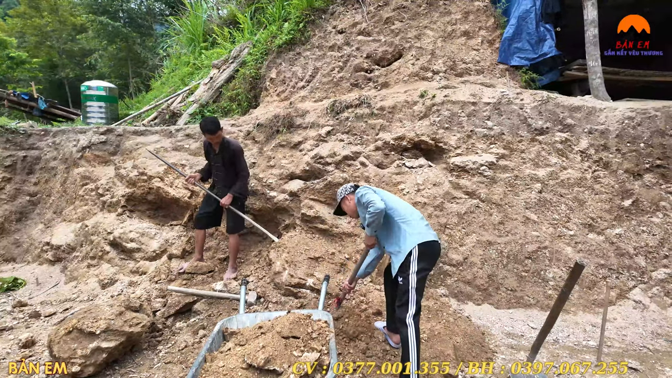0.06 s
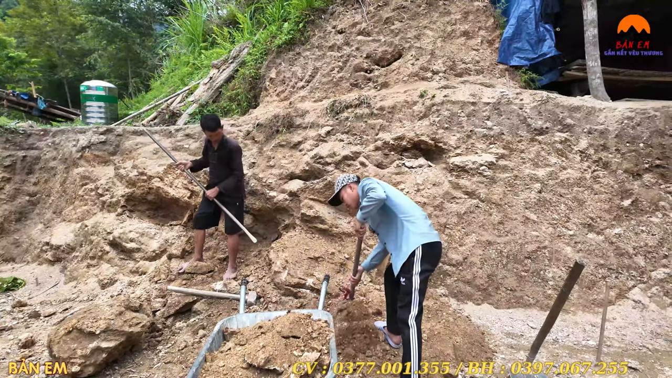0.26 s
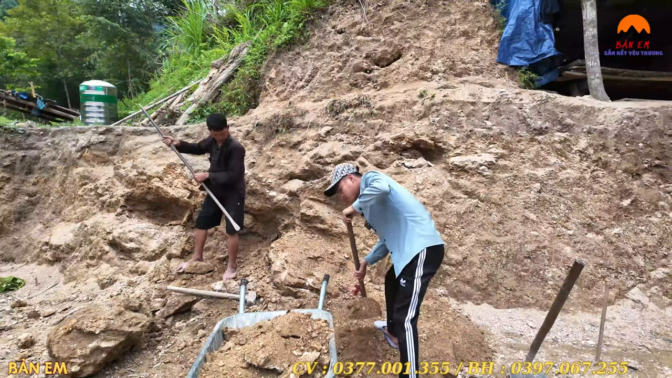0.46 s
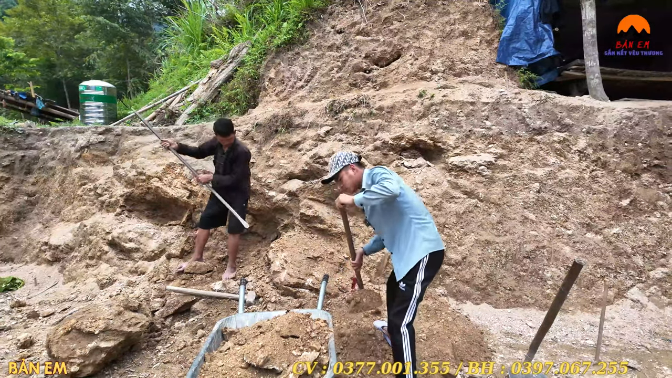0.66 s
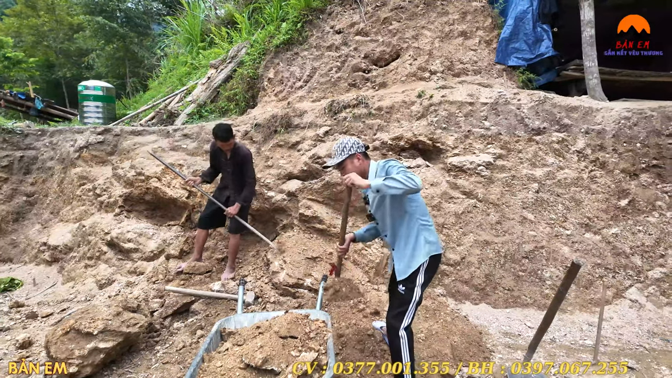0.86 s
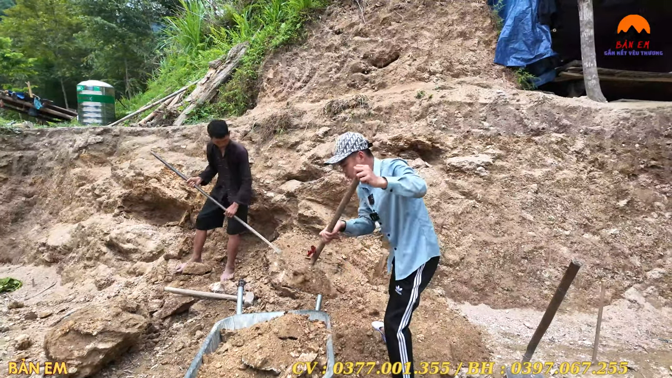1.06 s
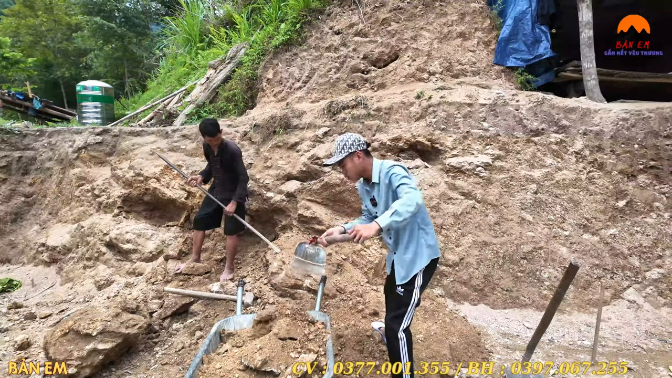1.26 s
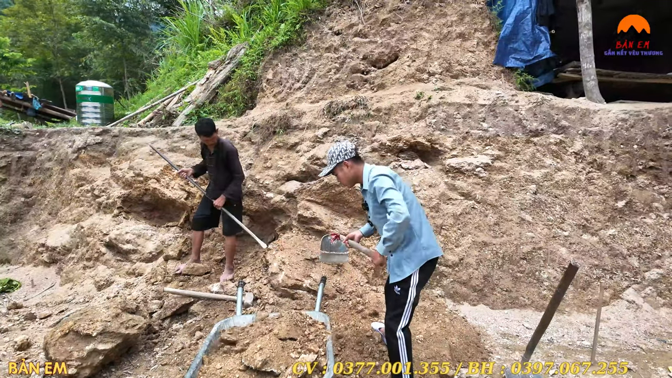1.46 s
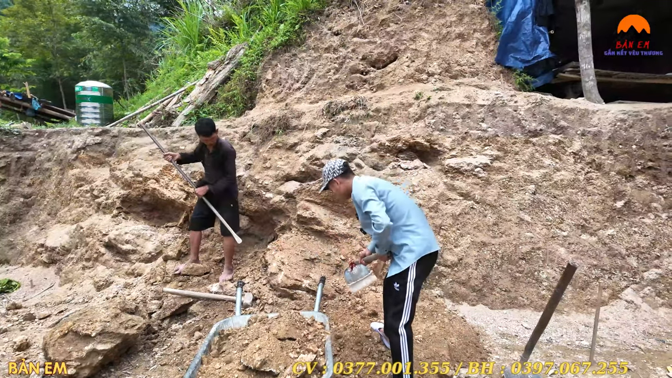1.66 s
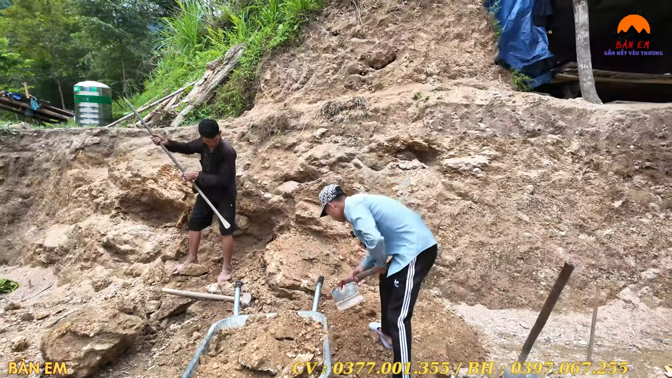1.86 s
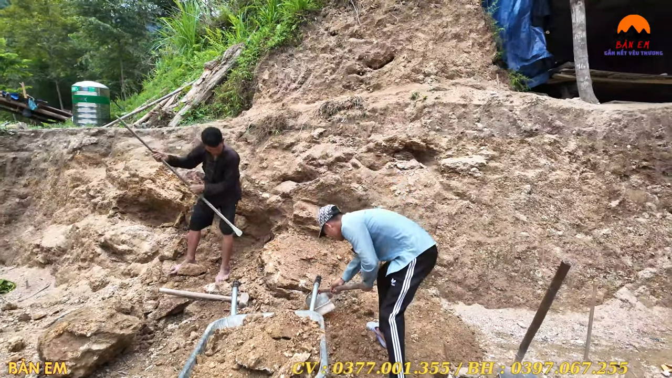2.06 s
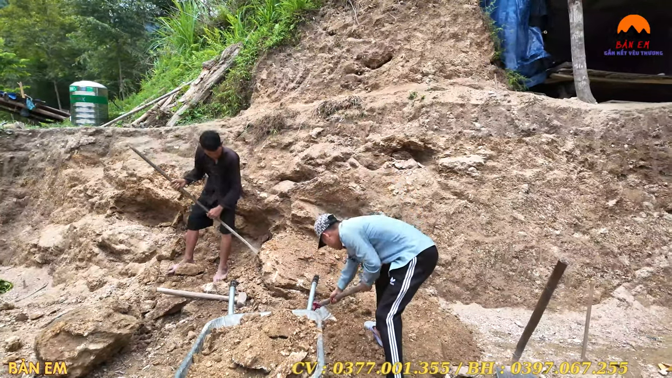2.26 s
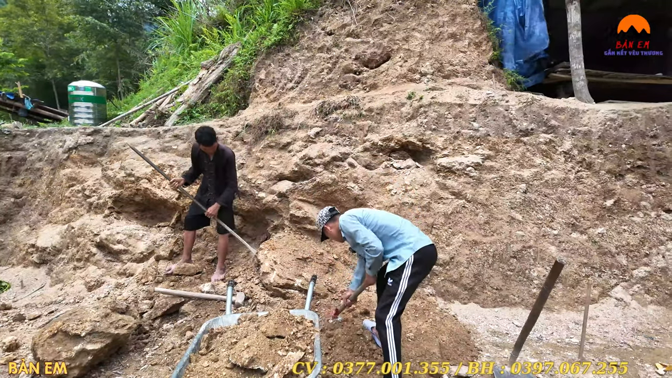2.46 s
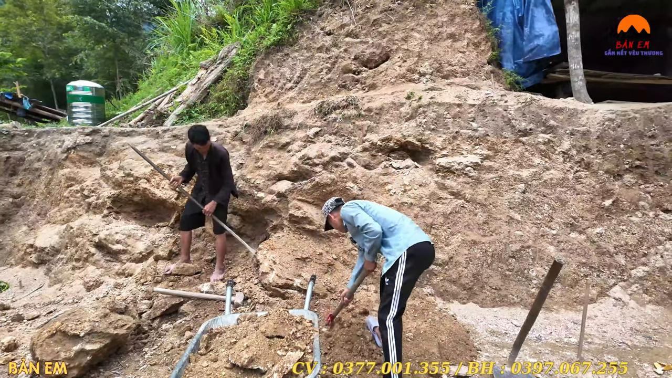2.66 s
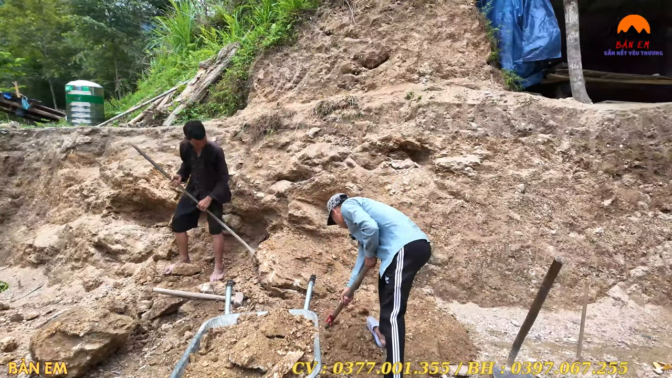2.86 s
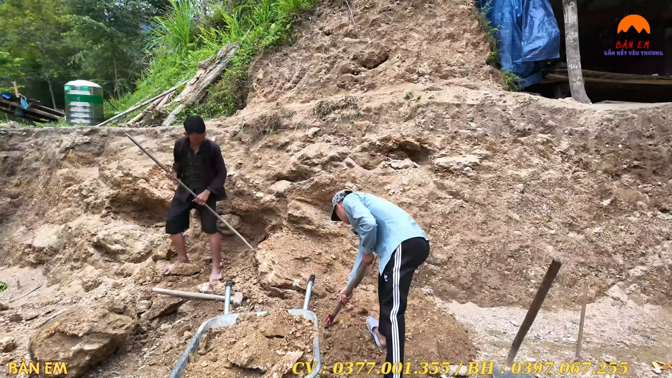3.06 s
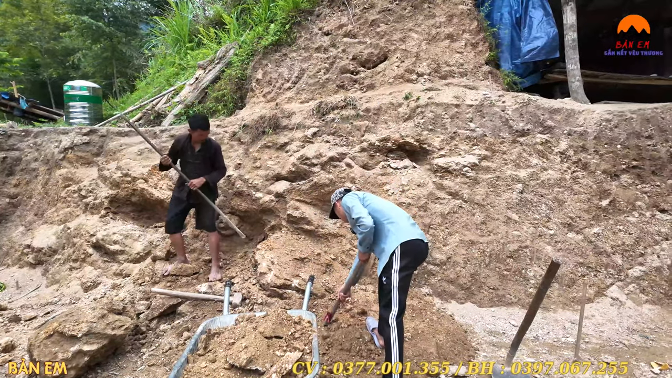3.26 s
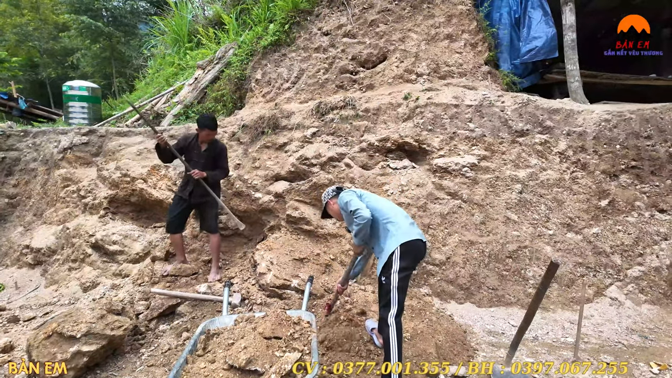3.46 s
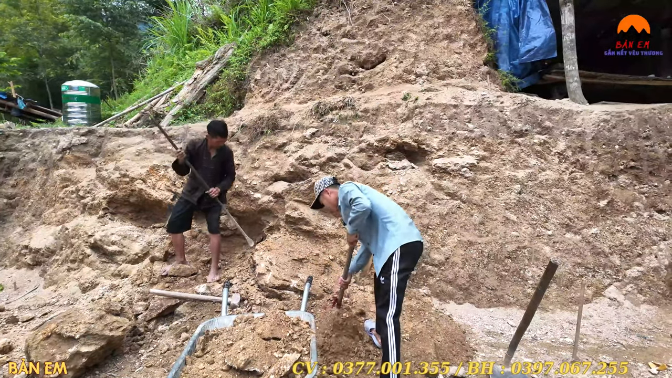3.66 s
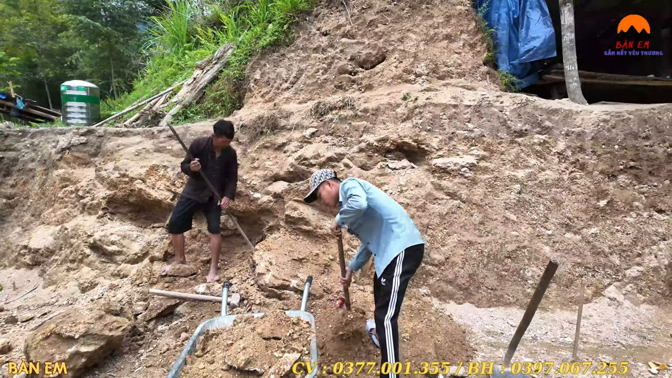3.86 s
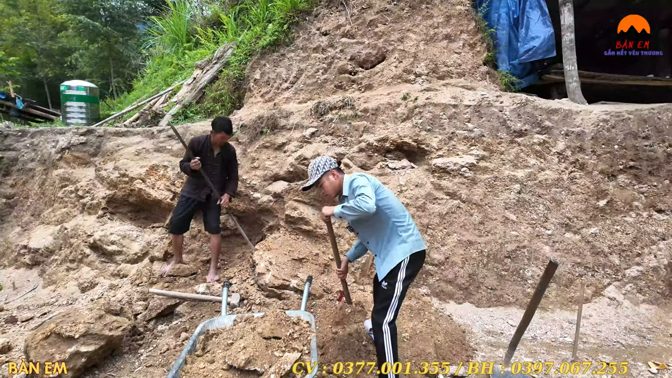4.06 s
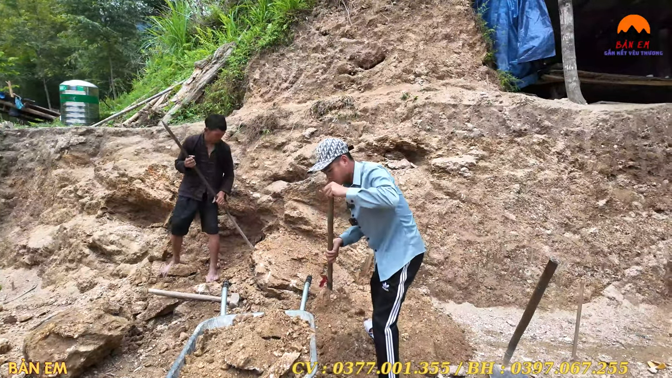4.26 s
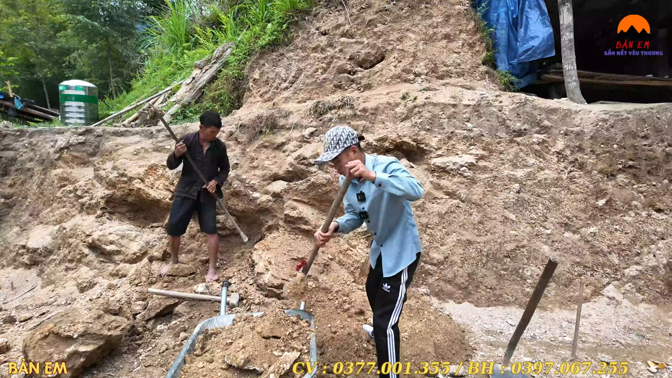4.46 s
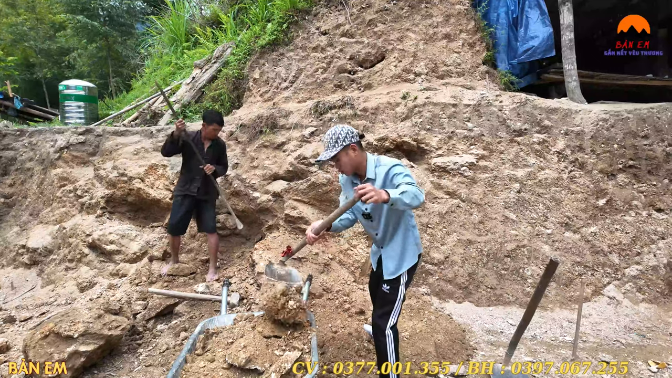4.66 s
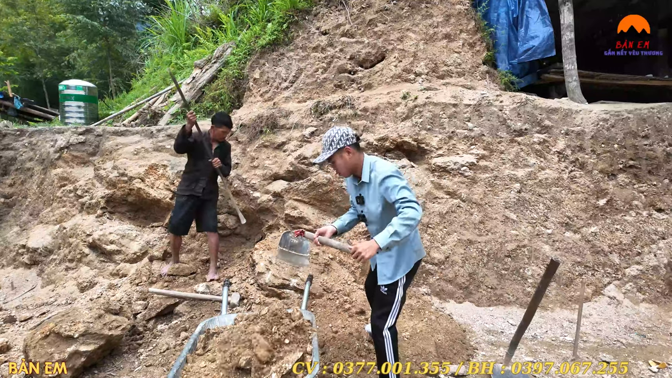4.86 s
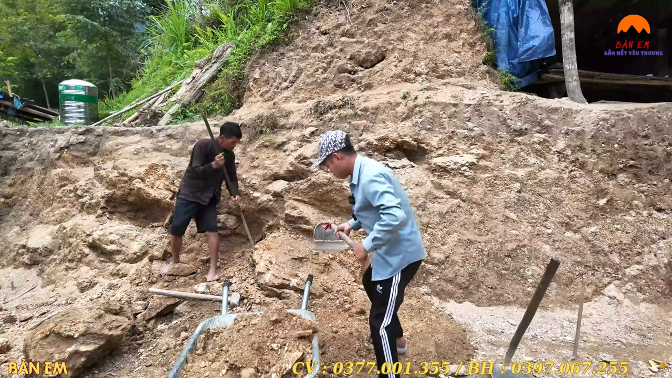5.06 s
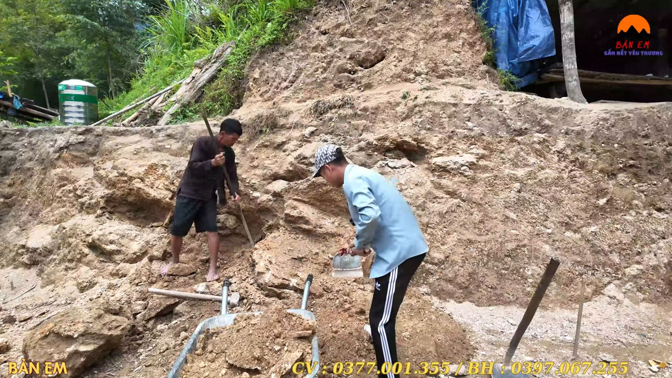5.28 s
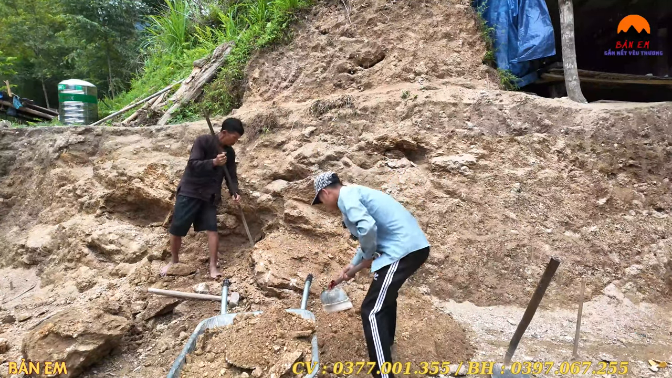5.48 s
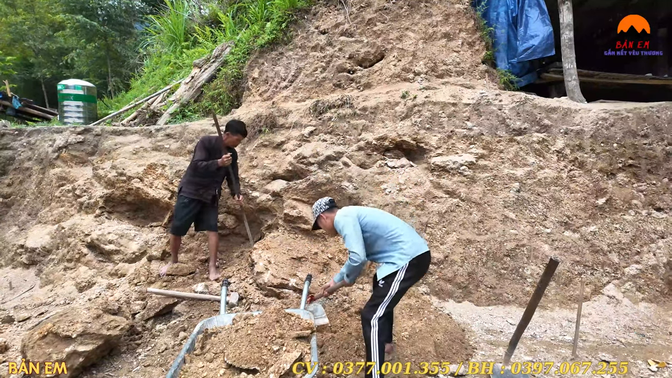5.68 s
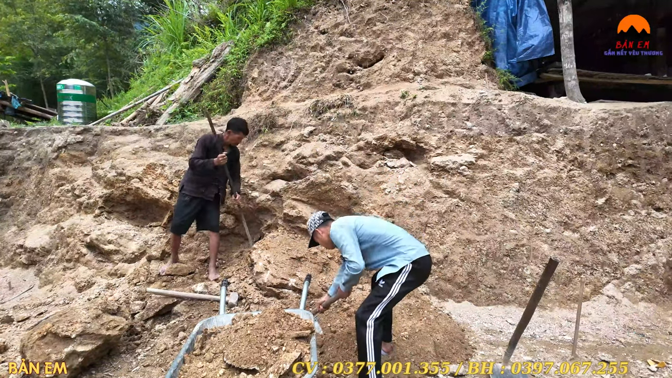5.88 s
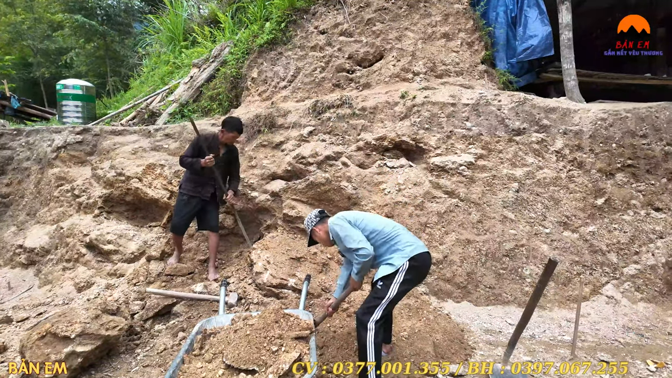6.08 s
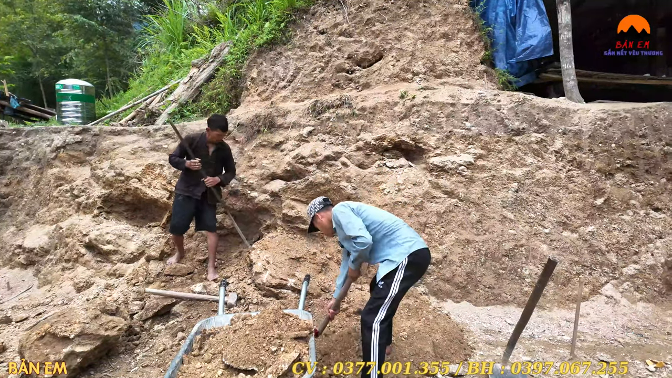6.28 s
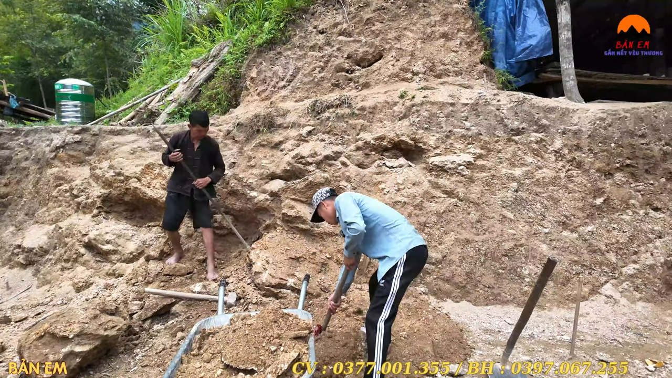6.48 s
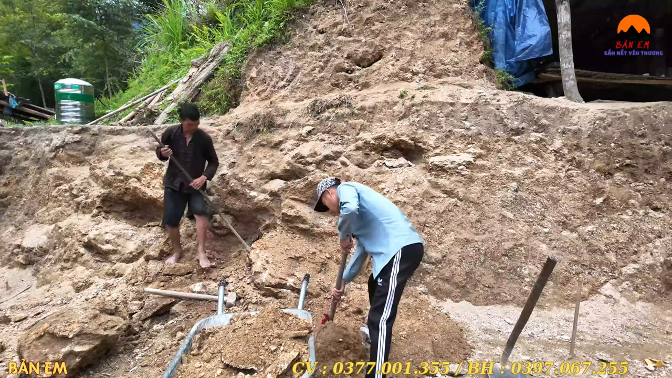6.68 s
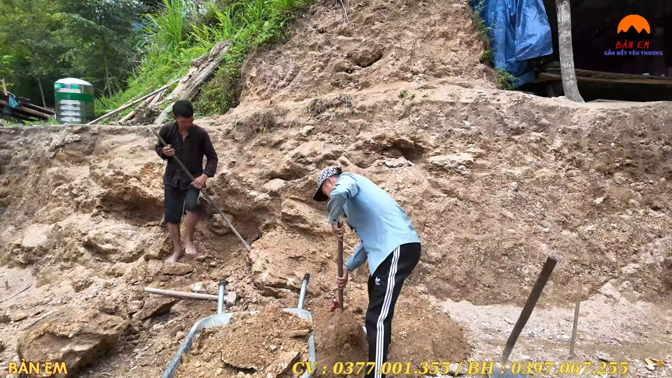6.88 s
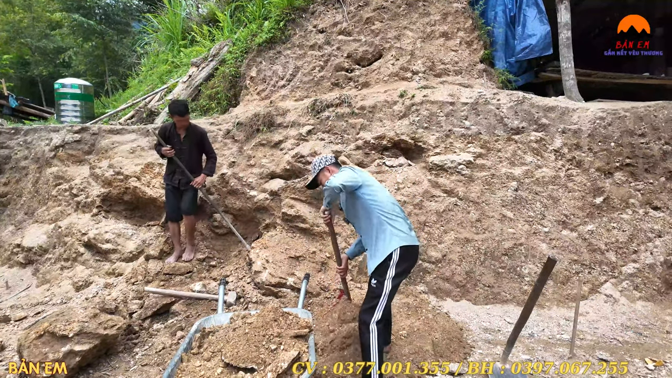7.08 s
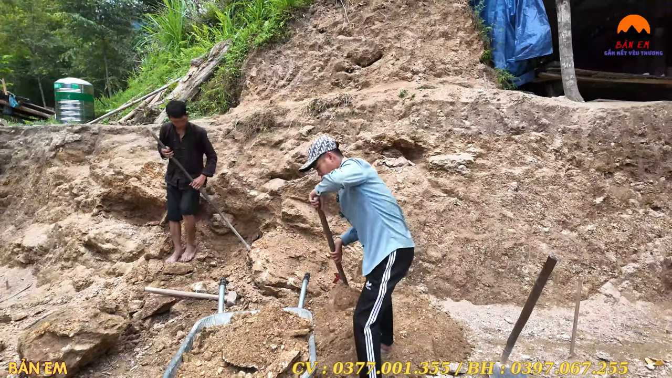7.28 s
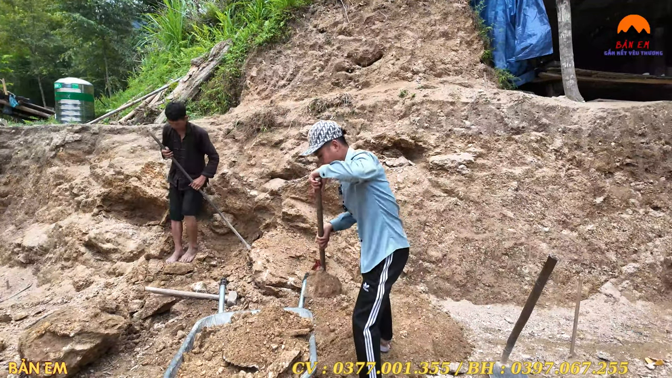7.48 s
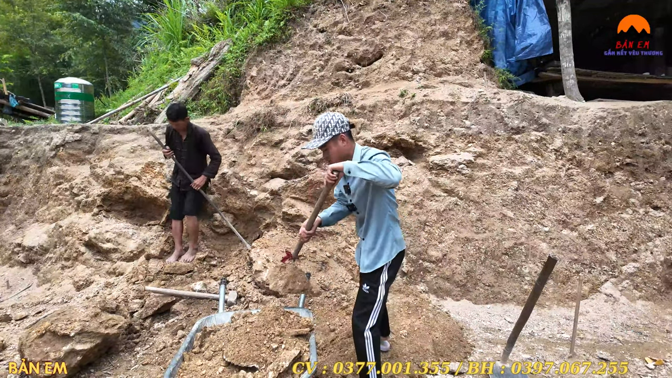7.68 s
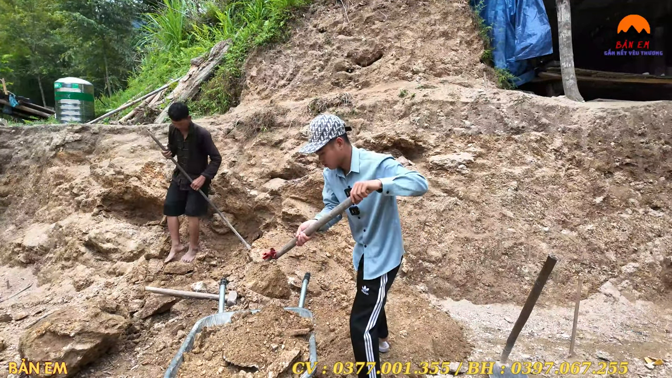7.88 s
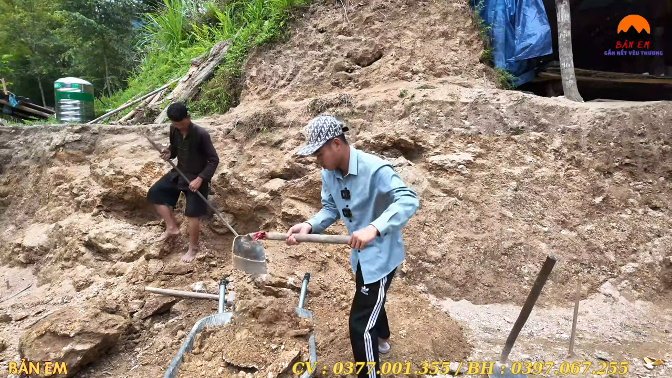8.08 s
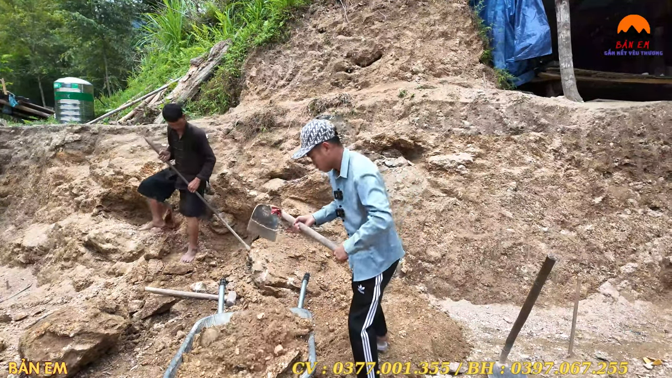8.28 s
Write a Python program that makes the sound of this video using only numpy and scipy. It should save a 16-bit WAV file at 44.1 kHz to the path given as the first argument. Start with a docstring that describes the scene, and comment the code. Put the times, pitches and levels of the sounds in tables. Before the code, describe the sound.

Two workers dig a rocky bank in open air. Crunching bar blows ring briefly, damped by the hands; the shovel pushes through gravel in scraping, clattering bursts, soil slides off its faintly ringing steel and clods thump on the heap. Boots shift on grit between strokes. The work is near and dry, stronger in the right channel, with a distant uneven engine, thin insect drone and a small bird behind it.

```python
"""Digging a rocky bank

Outdoors, close to the right microphone port, one worker jabs the bank with an iron bar and another shovels
the spoil: bursts of fractures and dying modes make the bar's blows, grains sticking and slipping make the
scoops, the blade rings as its load slides off, and clods thud on a heap as short low cycles.
Farther off, exhaust puffs through two resonances chug as a slow one-cylinder engine, narrow noise bands
drone as insects, gliding sines twitter as a small bird, and shaped noise is the open air."""
import sys
import numpy as np
from scipy import signal
from scipy.fft import rfft, irfft, next_fast_len
from scipy.io import wavfile
from scipy.ndimage import uniform_filter1d

SR = 44100
rng = np.random.default_rng(int(sys.argv[2]) if len(sys.argv) > 2 else 0)


def wrap_up_sound(samples):
    """Save the sound to the file named by the first command line argument, as 16-bit audio."""
    columns = np.atleast_2d(samples).T
    # keep every value between -1 and 1, then stretch to whole-number steps
    tamed = np.clip(columns, -1, 1)
    steps = np.round(tamed * 32767).astype(np.int16)
    wavfile.write(sys.argv[1], SR, steps)


N = 367353
TIME = np.arange(N) / SR

# Levels in the tables are relative: source and scene gains follow.
# Iron bar on rock: (time [s], crunch level [dB], crunch decay [s], crunch top [Hz],
# bending ring level [dB], lengthwise ring level [dB], hand damping [factor])
BAR_BLOWS = [(0.8701, -10, 0.0059, 5630, -31.5, -41, 1.7), (0.887, -29.5, 0.034, 7780, -36.5, -43, 1),
             (0.916, -27.5, 0.0044, 6800, -40.5, -41, 0.88), (0.956, -25.5, 0.0058, 7100, -37, -48, 1.855),
             (2.2296, -9.5, 0.0039, 4800, -33.5, -24, 0.97), (3.7798, -18, 0.0072, 5400, -27, -21, 6.4)]
# The bar's modes: (frequency [Hz], level [dB], undamped t60 [s], kind [0 bending, 1 lengthwise])
BAR_MODES = [(583, -26, 0.16, 0), (797, -23, 0.183, 0), (960, -9.5, .3, 0), (1250, -35, 0.3, 0),
             (1770, -6, 0.3, 0), (2050, 10.5, 0.25, 0), (2010, -5, 0.31, 1), (2086, -4, .12, 0),
             (2250, -19.5, 0.13, 0), (2740, -12, 0.077, 0), (2904, 7.5, 0.23, 0), (3050, 12, 0.081, 0),
             (3308, 8, 0.19, 0), (3690, 11.5, .18, 0), (3978, 7.5, 0.21, 1), (3970, -17.5, 0.082, 0),
             (4074, 19, 0.11, 0), (5260, 1.5, 0.28, 0), (5760, 3.5, 0.17, 0), (6080, -26.5, 0.16, 0),
             (5650, -4.5, .18, 0), (6200, -11.5, 0.21, 1), (6340, 11.5, 0.133, 0), (7000, 1, 0.2, 0),
             (7800, -28, .16, 0), (9130, -4, .14, 0), (9200, -19, .1, 0), (10000, -11.5, 0.15, 0),
             (10200, -27.5, .13, 0)]

# Dull blows into soft earth: (time [s], level [dB], pitch [Hz])
THUDS = [(1.274, -30.5, 144), (1.743, -30.5, 442), (2.23, -27, 95), (2.235, -19.5, 232),
         (3.425, -19.5, 442), (3.786, -36, 96), (4.485, -32, 186), (4.9228, -16, 405), (5.737, -29.5, 330),
         (5.973, -21, 367)]
THUD_SWELL_CYCLES = 0.58  # half the cycles from onset to the top of the swell

# Shoves of the shovel through gravel:
# (time [s], hold [s], release [s], level [dB], fine grit relative level [dB])
SHOVES = [(2.307, 0.16, .29, -30, -2.5), (2.626, 0.024, 0.11, -34.5, -2.5), (5.84, 0.019, 0.075, -30, -7),
          (5.906, 0.19, .27, -29.5, -6)]
# Gravel spectrum: (frequency [Hz], level [dB])
GRAVEL_SPECTRUM = [(120, -14.5), (250, -2.5), (400, 2.5), (660, 5.5), (1060, -0.5), (1800, 5), (2400, -4.5),
                   (4000, -5), (8000, -13), (12000, -27), (16000, -33)]
SHOVE_ATTACK_S, SHOVE_FADE_DB, SHOVE_FADE_SHAPE = 0.00713, -21.5, 1.34
GRIT_FADE_DB = -18  # extra fade: fine grit stops first as the blade slows

# Soil sliding off the blade: (time it leaves [s], slide length [s], hiss level [dB],
# ring level [dB], ring tilt [dB per octave])
THROWS = [(1.173, 0.105, -41.5, -48, 8), (4.688, 0.0841, -38, -43.5, -6), (8.073, .13, -38.5, -43.5, 6)]
# Sliding soil spectrum: (frequency [Hz], level [dB])
SLIDE_SPECTRUM = [(240, -42), (400, -3.5), (865, -2), (1040, -27), (1230, 4.5), (1350, -13), (1710, 1),
                  (2290, -2.5), (3470, -6), (16000, -26)]
# The shovel blade's modes: (frequency [Hz], level [dB], t60 [s])
BLADE_MODES = [(1342, -14, 2.3), (1532, -1.5, 1), (1706, -3, 0.33), (2150, -2.5, 1.44), (2747, 1, 0.17),
               (3750, -4.5, 0.76), (4330, -7, 0.36), (6480, -16, 0.4), (7500, -15, 0.54)]
BLADE_TILT_HZ = 1850  # the ring tilts about this pitch, over the blade's lowest modes

# Loads landing on the heap: (time [s], level [dB], pitch [Hz], lead of loose grit [s], grit level [dB])
LANDINGS = [(1.5039, -6.5, 333, 0.057, -30.5), (5.122, -5, 265.2, .013, -25)]
HEAP_T60_S = 0.074

# Stones knocking against the tools and each other, and near 3.42 s the bar jabbing dully into the soil: (time
# [s], level [dB], centre [Hz], band spread either side [factor])
KNOCKS = [(1.4783, -21, 1380, 3.2), (1.5305, -19, 880, 2.5), (1.595, -22, 1330, 2.8),
          (2.2034, -20, 1180, 1.8), (2.216, -14, 1400, 2.38), (2.234, -12, 700, 2.9),
          (2.2758, -17, 1090, 2.4), (2.3226, -20.5, 874, 2.96), (2.388, -19, 2160, 2.1),
          (2.412, -21.5, 1980, 1.8), (2.521, -22, 1140, 1.38), (2.609, -20, 2200, 1.896),
          (2.6405, -24, 1424, 2.5), (2.7145, -31.5, 1002, 2.5), (2.8087, -31.5, 1168, 1.84),
          (3.151, -41, 1330, 1.65), (3.23, -38.5, 1140, 1.8), (3.415, -20.5, 1200, 3.44),
          (3.423, -17, 1120, 3.48), (4.97, -36.5, 3300, 2.61), (4.993, -39.5, 930, 2.3),
          (5.037, -25.5, 840, 2.9), (5.1705, -24, 1170, 2.58), (5.7007, -34, 1290, 1.5),
          (5.838, -16, 1360, 2.76), (5.85, -13, 900, 1.66), (5.916, -21, 1620, 1.87),
          (5.931, -17.5, 870, 1.76), (5.9835, -17.5, 1530, 1.65), (6.008, -18, 1820, 2.6),
          (6.087, -18, 1190, 2.4), (6.139, -21.5, 990, 2.3), (6.1774, -13, 940, 1.95),
          (6.2462, -22.5, 1214, 2.84), (6.2923, -33, 1090, 1.3)]
KNOCK_DECAY_S = 0.0044
PEBBLE_SPREAD = 2.1  # band spread of the small pebbles, as a factor
# Small hard clicks close to the right port:
# (time [s], level [dB], centre [Hz], band spread either side [factor])
CLICKS = [(1.038, -27.5, 1474, 3.19), (1.6531, -21, 2520, 1.55), (5.4254, -8.5, 2580, 1.11),
          (5.4425, -30, 2520, 1.13)]

# Boots shifting on loose grit: (time [s], length [s], tread level [dB], crackle level [dB])
STEPS = [(0, 0.14, -51.5, -50), (0.15, 0.6, -73, -63), (1.305, 0.1694, -50, -51), (1.541, 0.15, -44, -52),
         (1.801, 0.2357, -46.5, -72), (2.75, 0.2476, -51.5, -82), (4.339, 0.192, -45.5, -55),
         (4.771, 0.096, -49, -60.5), (4.934, 0.33, -44.5, -49), (5.678, 0.21, -44.5, -44.5),
         (6.35, 0.45, -57, -62.5), (7.571, 0.14, -48.5, -52)]
# Tread spectrum: (frequency [Hz], level [dB])
TREAD_SPECTRUM = [(60, -2), (150, 7), (400, 6.5), (900, -1.5), (2000, -15.5), (5000, -87)]
# Grit crackle spectrum: (frequency [Hz], level [dB])
CRACKLE_SPECTRUM = [(1000, -28), (2500, 8), (6000, 7.5), (9500, 4), (13000, -1.5), (16000, -10)]

# Bird notes: (time [s], centre [Hz], glide [octaves], level [dB])
CHIRPS = [(.577, 5660, 0.58, -50), (2.097, 6290, 0.42, -46), (5.266, 4340, -.18, -44),
          (5.372, 5200, -0.255, -50.5), (5.403, 5170, -.33, -50.5), (5.47, 6480, -0.21, -52.5),
          (5.51, 6200, -0.227, -53), (5.537, 5330, -0.336, -47), (5.61, 6500, -.24, -52.5),
          (5.665, 5720, -.26, -49)]
CHIRP_S = 0.0257

# Engine speed: (time [s], rate [firings per s])
ENGINE_SPEED = [(0, 33), (.35, 25), (.6, 26.3), (.92, 33.5), (1.15, 26), (1.9, 26), (2.4, 21.3),
                (2.85, 21.3), (3.25, 23.6), (4.0, 31.5), (4.55, 22.5), (5.3, 20.5), (6.9, 21.3), (8.33, 23)]
# Engine level: (time [s], level [dB])
ENGINE_LEVEL = [(0, -54), (2.7, -48.5), (3.2, -48.5), (4.3, -52), (6.2, -46.5), (8.33, -48)]
# Exhaust resonances: (multiple of the base resonance [factor], width of one smoothing pass [Hz], level [dB])
ENGINE_MODES = [(1.001, 99, 3), (1.62, 74, -4.5)]
IDLE_RATE, FULL_RATE = 19.8, 35.6  # firings per s
THROTTLE_LEAD_S = 0.48  # the throttle opens ahead of the speed
EXHAUST_IDLE_HZ, EXHAUST_FULL_HZ = 139.1, 186.4

# Insect bands: (centre [Hz], width [Hz], level [dB])
INSECT_BANDS = [(3683, 560, 1.5), (4653, 730, 0), (5320, 550, -8.5), (7280, 1300, -16.5)]
# Insect level: (time [s], level [dB])
INSECT_LEVEL = [(0, -49.5), (1.7, -54.5), (2.1, -49.5), (3.7, -49.5), (4.2, -52.5), (6.5, -51.5),
                (7.3, -55), (8.33, -52.5)]
# A faint distant rush: (time [s], level [dB])
RUSH_LEVEL = [(6.6, -103.5), (6.95, -63), (7.3, -52.5), (7.5, -94), (7.9, -54.5), (8.33, -66)]
# Outdoor air spectrum: (frequency [Hz], level [dB])
AIR_SPECTRUM = [(15, -50.5), (30, -36.5), (50, -13), (90, -6.5), (160, -5), (300, -12.5), (700, -18),
                (1500, -25), (2400, -20.5), (3100, -25), (6200, -29.5), (9500, -40), (16000, -48)]
# Outdoor air level: (time [s], level [dB])
AIR_LEVEL = [(0, -47.5), (.6, -54.5), (2, -48.5), (3, -49), (4.1, -55), (4.8, -46.5), (6.6, -50.5),
             (7.6, -54), (8.33, -48.5)]
# Distant field: (frequency [Hz], left-right likeness [0 to 1])
FAR_LIKENESS = [(60, 0.14), (150, 0.65), (380, 0.71), (950, 0.28), (2380, 0), (5980, 0), (15000, 0.079)]
# Distant field: (frequency [Hz], left minus right [dB])
FAR_BALANCE = [(60, -0.5), (150, -20), (380, -13.5), (950, -13), (2380, -10.5), (5980, -9.5), (15000, -1)]

# The close work: (frequency [Hz], left minus right [dB])
WORK_BALANCE = [(60, -9), (250, -9), (600, -9.5), (1100, -9.5), (2200, -11.5), (4000, -10), (8000, -6.5),
                (13000, -6)]
# The close work: (frequency [Hz], left-right likeness [0 to 1])
WORK_LIKENESS = [(60, 0.99), (300, 1), (700, 0.57), (1400, 0.09), (3000, 0.113), (8000, 0.036)]
EDGE_HZ = 16100  # upper band limit


def iron_bar(crunch_low_hz=560, scatter_db=-0.5, ring_db=-3, clank_db=-12, clank_t60=0.151):
    """The tip crushes rock and the bar rings until the hands damp it; a square hit rings it lengthwise."""
    out = np.zeros(N)
    hz, mode_db, t60, lengthwise = np.transpose(BAR_MODES)
    # many weak modes thicken the clank
    weak_hz = np.geomspace(900, 10000, num=140) * (1 + .015 * rng.standard_normal(size=140))
    weak_db = clank_db - 10 * np.log10(1 + (weak_hz / 5500) ** 4)
    for s, crunch_db, decay, top_hz, bend_db, length_db, damping in BAR_BLOWS:
        add(out, s, crunch(crunch_db, crunch_low_hz, top_hz, decay, rise_share=0.66, dust_db=-8.5))
        bending_db = bend_db + scatter_db * rng.standard_normal(len(hz))
        drive_db = np.where(lengthwise > .5, length_db, bending_db)
        add(out, s + 0.001067, ring(hz, mode_db + drive_db + ring_db, t60 / damping))
        add(out, s + 0.00095, ring(weak_hz, weak_db + bend_db, clank_t60 / damping))
    return out


def thuds(crumb_db=-14, crumb_low=0.533, crumb_high=11, crumb_s=0.00266):
    """Dull blows, each with a crumbling whose band lies at multiples of its pitch."""
    out = np.zeros(N)
    for s, db, hz in THUDS:
        add(out, s, thud(db, hz))
        add(out, s - .002, crunch(db + crumb_db, crumb_low * hz, crumb_high * hz, crumb_s))
    return out


def scoops(coarse_db=3.5, pebble_db=2):
    """The blade sticks and slips through gravel, so its grains come in clumps; pebbles tumble over it."""
    out = np.zeros(N)
    for s, hold, release, db, fine_db in SHOVES:
        t = np.arange(0, hold + release, 1 / SR)
        slowing = np.maximum((t - hold) / release, 0) ** SHOVE_FADE_SHAPE
        slips = clumps(len(t), depth_db=3.0, clump_s=0.0095)
        coarse = coloured(grains(len(t), per_s=1300, spread_db=1.5) * slips, GRAVEL_SPECTRUM)
        coarse = evened(shaped(coarse, lambda hz: 1 / np.sqrt(1 + (hz / 4500) ** 8)))
        fine = coloured(grains(len(t), per_s=7200, spread_db=-5.0) * slips, GRAVEL_SPECTRUM)
        fine = evened(band(fine, 4700, 18000, order=4))
        sound = gain_of(coarse_db) * coarse + gain_of(fine_db + GRIT_FADE_DB * slowing) * fine
        for when, pebble in pebbles(hold + release, per_s=34, db=pebble_db, centre_hz=1600,
                                    spread_db=-0.5, spread_octaves=0.2):
            add(sound, when, pebble)
        attack = np.minimum(t / SHOVE_ATTACK_S, 1)
        add(out, s, gain_of(db + SHOVE_FADE_DB * slowing) * attack * sound)
    return out


def throws(damped_t60=.09, blade_share=0.584, cutoff_s=0.007):
    """Soil hisses along the blade and damps it; once the load has left, the steel rings freely."""
    out = np.zeros(N)
    hz, mode_db, t60 = np.transpose(BLADE_MODES)
    for s, length, hiss_db, ring_db, tilt in THROWS:
        t = np.arange(-length, .08, 1 / SR)  # 0 as the load leaves
        sand = grains(len(t), per_s=9000, spread_db=2.5)
        steel = signal.fftconvolve(sand, ring(hz, mode_db, damped_t60))[:len(t)]
        hiss = evened(coloured(sand, SLIDE_SPECTRUM) + blade_share * evened(steel))
        flow = np.minimum(1 + t / length, 1) ** 0.27 * np.exp(-np.maximum(t, 0) / cutoff_s)
        add(out, s - length, gain_of(hiss_db) * flow * hiss)
        # the tilt acts within a quarter octave and is level beyond it
        tilt_db = tilt * np.clip(np.log2(hz / BLADE_TILT_HZ), -.25, .25)
        add(out, s, ring(hz, mode_db + ring_db + tilt_db, t60))
        add(out, s - .006, crunch(hiss_db + 4.5, 1150, 5570, 0.0089))  # the last stones tick over the edge
    return out


def landings(grit_share=0.865, burst_db=-14, slap_db=-12, slap_multiple=1.82,
             heap_db=-8, heap_hz=198, heap_delay_s=0.0055):
    """Bunched loose grit patters down first; then the load thuds and bursts, and the heap gives way."""
    out = np.zeros(N)
    for s, db, hz, lead, grit_db in LANDINGS:
        grit = crunch(grit_db, 1000, 7000, grit_share * lead, rise_share=0.054, dust_db=-5, dust_top_hz=11700)
        add(out, s - lead, grit * clumps(len(grit), depth_db=3.0, clump_s=0.0028))
        add(out, s - .004, crunch(db + burst_db, 240, 1800, decay=.006))
        add(out, s, thud(db, hz) + thud(db + slap_db, hz * slap_multiple))
        add(out, s + heap_delay_s, ring(np.array([heap_hz]), db + heap_db, HEAP_T60_S))
    return out


def stones(level_db=-2.0, left_db=0.5):
    """The larger stones knock, and the bar jabs dully into the soil; returns what faces the left and the right
    port."""
    out = np.zeros(N)
    for s, db, hz, spread in KNOCKS:
        add(out, s, knock(db + level_db, hz, spread))
    return gain_of(left_db) * out, out


def clicks(decay_s=0.00099, left_db=-20, body_db=-9):
    """Hard, dry ticks: a narrow band over a weaker broad one; returns both ports."""
    out = np.zeros(N)
    for s, db, hz, spread in CLICKS:
        add(out, s, crunch(db, hz / spread, hz * spread, decay_s, dust_db=-53))
        add(out, s + 0.00065, crunch(db + body_db, 900, 4100, decay_s))
    return gain_of(left_db) * out, out


def steps(pebble_db=3.0):
    """Soft treads with separate grains of grit snapping under them and a few pebbles kicked loose."""
    out = np.zeros(N)
    for s, length, tread_db, crackle_db in STEPS:
        size = int(length * SR)
        tread = gain_of(tread_db) * coloured(grains(size, per_s=900, spread_db=5.0), TREAD_SPECTRUM)
        snaps = grains(size, per_s=5000, spread_db=3.5) * clumps(size, depth_db=6, clump_s=0.0076)
        grit = gain_of(crackle_db) * coloured(snaps, CRACKLE_SPECTRUM)
        for when, pebble in pebbles(length, per_s=22, db=tread_db + pebble_db, centre_hz=1560,
                                    spread_octaves=1.73):
            add(tread, when, pebble)
        add(out, s, (tread + grit) * signal.windows.tukey(size, .6))
    return out


def trickle(db=-72, tick_s=0.0013):
    """Single grains of grit tick faintly as they roll down the heap and the bank."""
    moments = abs(grains(N, per_s=16, spread_db=5.0))
    tick = np.exp(-np.linspace(-3, 3, int(6 * tick_s * SR)) ** 2)
    swell = signal.oaconvolve(moments, tick)[:N]
    return gain_of(db) * evened(band(swell * rng.standard_normal(N), 2500, 15000, order=1))


def engine(load_db=1.0, uneven=0.32, left_db=-9.5):
    """One exhaust puff a firing through two broad resonances that rise with the load."""
    rate, = follow(ENGINE_SPEED, TIME)
    level_db, = follow(ENGINE_LEVEL, TIME)
    acceleration = uniform_filter1d(np.gradient(rate) * SR, size=4000)
    demand = rate + THROTTLE_LEAD_S * acceleration
    load = np.clip((demand - IDLE_RATE) / (FULL_RATE - IDLE_RATE), 0, 1)
    base_hz = EXHAUST_IDLE_HZ + (EXHAUST_FULL_HZ - EXHAUST_IDLE_HZ) * load
    firings = np.diff(np.floor(np.cumsum(rate) / SR), prepend=0)
    puffs = firings * (1 + uneven * rng.standard_normal(N))
    chug = np.zeros(N)
    for multiple, width_hz, mode_db in ENGINE_MODES:
        # a moving resonance: shift it down to 0 Hz, smooth three times, shift back
        turn = np.exp(2j * np.pi * np.cumsum(multiple * base_hz) / SR)
        r = np.exp(-np.pi * width_hz / SR)
        smooth = puffs / turn + 1e-18
        for _ in range(3):
            smooth = signal.lfilter([1 - r], [1, -r], smooth)
        chug += gain_of(mode_db) * (turn * smooth).real
    chug = gain_of(level_db + load_db * load) * evened(chug)
    left = gain_of(left_db)
    return np.array([left * chug, chug]) * 2 / (1 + left)


def bird(waver=0.041):
    """Thin, quick glides: short sines sweeping in pitch with a small random waver."""
    out, size = np.zeros(N), int(CHIRP_S * SR)
    for s, centre_hz, octaves, db in CHIRPS:
        glide = 2 ** (octaves * np.linspace(-.5, .5, size))
        wander = evened(uniform_filter1d(rng.standard_normal(size), size=60))
        hz = centre_hz * glide * (1 + waver * wander)
        note = np.sin(2 * np.pi * np.cumsum(hz) / SR)
        add(out, s, gain_of(db) * signal.windows.tukey(size, .6) * note)
    return out


def insects(level_db=4, throb_db=1.87):
    """A chorus in a few narrow noise bands, its level throbbing at random."""
    def chorus(hz):
        """Root of the summed powers of the bands."""
        return np.sqrt(sum((gain_of(db) / (1 + (2 * (hz - f) / w) ** 2)) ** 2 for f, w, db in INSECT_BANDS))

    throb = evened(shaped(rng.standard_normal(N), lambda hz: np.exp(-hz / 25)))
    drone = evened(shaped(rng.standard_normal(N), chorus))
    return gain_of(follow(INSECT_LEVEL, TIME)[0] + level_db + throb_db * throb) * drone


def open_air(air_db=3, rush_db=3):
    """Outdoor air as shaped noise, and a distant rush in a band of mid-low noise."""
    air = gain_of(follow(AIR_LEVEL, TIME)[0] + air_db) * coloured(rng.standard_normal(N), AIR_SPECTRUM)
    rush = evened(band(rng.standard_normal(N), 484, 870))
    return air + gain_of(follow(RUSH_LEVEL, TIME)[0] + rush_db) * rush


def hillside():
    """Air, rush and insects, drawn twice so that the distance surrounds both ports."""
    return far_pair(open_air() + insects(), open_air() + insects())


def far_pair(sound_a, sound_b):
    """Spreads two unrelated sounds over the ports as a distant field."""
    def same(hz):
        """Likeness of the ports."""
        return np.clip(read(FAR_LIKENESS, hz), 0, 1)

    left = shaped(sound_a, same) + shaped(sound_b, lambda hz: np.sqrt(1 - same(hz) ** 2))
    return np.array([shaped(left, lambda hz: gain_of(read(FAR_BALANCE, hz))), sound_a])


def left_port(x):
    """Shaded from the work: weaker, and its treble arrives by scattered paths."""
    def response(hz):
        """A direct path and one of random phase, their peaks and dips partly levelled."""
        same = np.clip(read(WORK_LIKENESS, hz), 0, 1)
        knots = np.arange(0, SR / 2, 400)
        phase = np.cumsum(np.pi * rng.uniform(-0.964, 1, len(knots)))
        scattered = np.exp(-1j * np.interp(hz, knots, phase))
        paths = same + np.sqrt(1 - same ** 2) * scattered
        return gain_of(read(WORK_BALANCE, hz)) * paths / np.sqrt(abs(paths) + 0.072)

    return shaped(x, response)


def scatter(x, t60, delay):
    """Dense weak reflections from rough ground, energy 1."""
    t = np.arange(SR // 2) / SR
    taps = band(rng.standard_normal(len(t)), 78, 11300, order=1) * gain_of(-60 * t / t60)
    echo = np.pad(taps / np.linalg.norm(taps), (int(delay * SR), 0))
    return signal.oaconvolve(x, echo)[:N]


def crunch(db, low_hz, high_hz, decay, rise_share=1.0, dust_db=-15, dust_top_hz=8500):
    """A burst of fractures: the stone's size sets the band, dust adds a little treble."""
    t = np.arange(SR // 6) / SR
    envelope = (1 - np.exp(-t / (rise_share * decay))) * np.exp(-t / decay)
    burst = rng.standard_normal(len(t)) * envelope
    dust_gain = gain_of(dust_db) * np.sqrt(abs(high_hz - low_hz) / 4000)
    sound = band(burst, low_hz, high_hz, order=3) + dust_gain * band(burst, low_hz, dust_top_hz)
    return gain_of(db) * sound * np.sqrt(decay * SR / np.sum(sound ** 2))


def knock(db, hz, spread):
    """One stone knocks without ringing; the smaller it is, the higher its band."""
    return crunch(db, hz / spread, hz * spread, KNOCK_DECAY_S, rise_share=0.37, dust_db=-18, dust_top_hz=10000)


def pebbles(length, per_s, db, centre_hz, spread_db=8.5, spread_octaves=0.377):
    """Small stones roll over at loosely spaced moments, 24 at most; yields (time [s], sound)."""
    for k, (when, loud, pitch) in enumerate(rng.uniform(-0.86, 1, (24, 3))):
        s = (k + .5 + .5 * when) / per_s
        if s < length:
            yield s, knock(db + spread_db * loud, centre_hz * 2 ** (spread_octaves * pitch), PEBBLE_SPREAD)


def thud(db, hz):
    """Earth gives way under a blow: two or three low cycles."""
    cycles = hz * np.arange(SR // 8) / SR - 2 * THUD_SWELL_CYCLES
    u = 1 + cycles / (2 * THUD_SWELL_CYCLES)
    return gain_of(db) * (u * np.exp(1 - u)) ** 2 * np.sin(2 * np.pi * cycles)


def ring(hz, db, t60):
    """Freely dying modes with a soft onset, held for one t60 and at most 1 s."""
    t = np.arange(int(SR * np.clip(np.max(t60), .01, 1)))[:, None] / SR
    phase = 2 * np.pi * rng.random(len(hz))
    modes = gain_of(db - 60 * t / t60) * np.sin(2 * np.pi * hz * t + phase)
    return modes.sum(1) * (1 - np.exp(-t[:, 0] / 0.00132))


def grains(size, per_s, spread_db):
    """Tiny fractures at random moments, of random sign and uneven strength, at rms 1."""
    chance, sign = rng.random((2, size))
    strength = gain_of(spread_db * np.minimum(rng.exponential(1, size), 4))
    return evened((chance < per_s / SR) * np.sign(sign - .5) * strength)


def clumps(size, depth_db, clump_s):
    """A gain that comes and goes, as loose grains move in bunches."""
    drift = shaped(rng.standard_normal(size), lambda hz: np.exp(-(hz * clump_s) ** 2))
    return gain_of(depth_db * evened(drift))


def gain_of(db):
    """Decibels to amplitude."""
    return 10 ** (np.asarray(db) / 20)


def evened(x):
    """Scales to rms 1."""
    return x / np.sqrt(np.mean(x ** 2) + 1e-20)


def read(points, hz):
    """Reads a spectrum on a log-frequency axis."""
    f, value = np.transpose(points)
    return np.interp(np.log(hz + 1), np.log(f + 1), value)


def follow(rows, t):
    """Every column of a curve at the times t."""
    s, *columns = np.transpose(rows)
    return [np.interp(t, s, c) for c in columns]


def add(mix, s, sound):
    """Mixes a sound in at s seconds."""
    part = mix[max(round(s * SR), 0):][:len(sound)]
    part += sound[:len(part)]


def shaped(x, response):
    """Filters by a response given as a function of Hz."""
    size = next_fast_len(len(x) + 2048)
    return irfft(rfft(x, size) * response(np.fft.rfftfreq(size, 1 / SR)), size)[:len(x)]


def coloured(x, points):
    """Gives x a spectrum, at rms 1."""
    return evened(shaped(x, lambda hz: gain_of(read(points, hz))))


def band(x, low_hz, high_hz, order=2):
    """Causal band-pass, its edges kept apart and below the top of the range."""
    high_hz = min(max(high_hz, low_hz * 1.1), SR * .45)
    low_hz = min(low_hz, high_hz / 1.1)
    return signal.sosfilt(signal.butter(order, [low_hz, high_hz], "band", fs=SR, output="sos"), x)


def scene(work_db=4.5, bank_db=-23):
    """Close work mostly in the right port with a faint short echo off the earth bank; the rest lies behind."""
    centred = [iron_bar(), thuds() + landings(), scoops(), throws() + steps() + trickle() + bird()]
    sources = [stones(), clicks()] + [(x, x) for x in centred]
    left = sum(left_port(x) for x, _ in sources)  # each group by its own scattered paths
    right = sum(x for _, x in sources)
    work = np.array([port + gain_of(bank_db) * scatter(port, t60=0.19, delay=0.0065) for port in (left, right)])
    return gain_of(work_db) * work + engine() + hillside()


def record(dry):
    """Peaks beyond full scale are cut flat; then the band limit."""
    clipped = np.clip(dry, -1, 1)
    low_pass = signal.firwin(511, EDGE_HZ, window=("kaiser", 9), fs=SR)
    return signal.oaconvolve(clipped, low_pass[None], "same")


dry = scene()
out = record(dry)
wrap_up_sound(out)
```